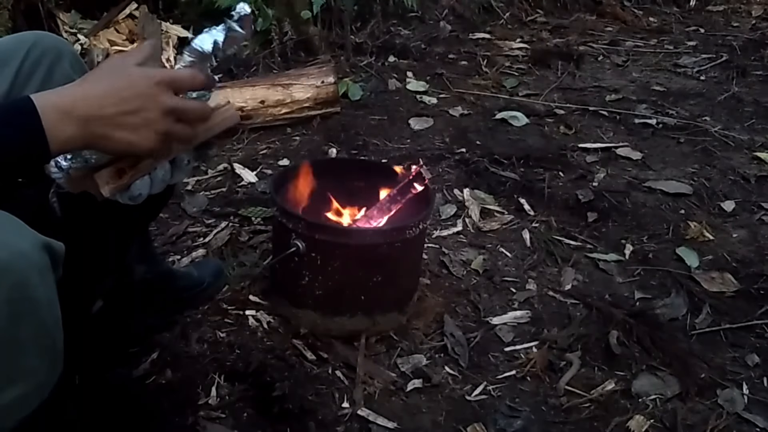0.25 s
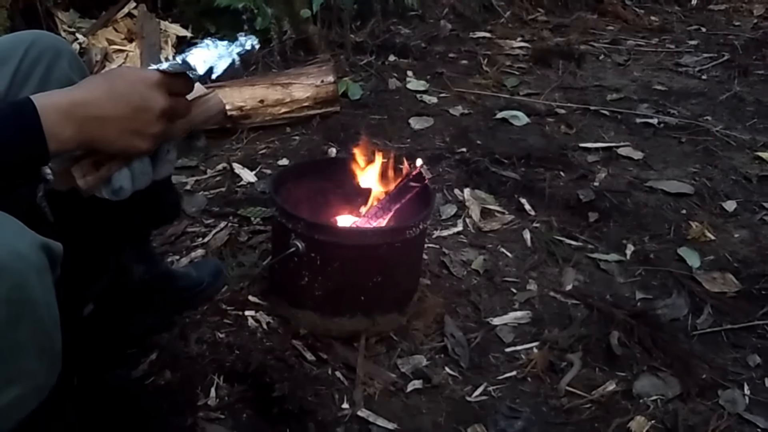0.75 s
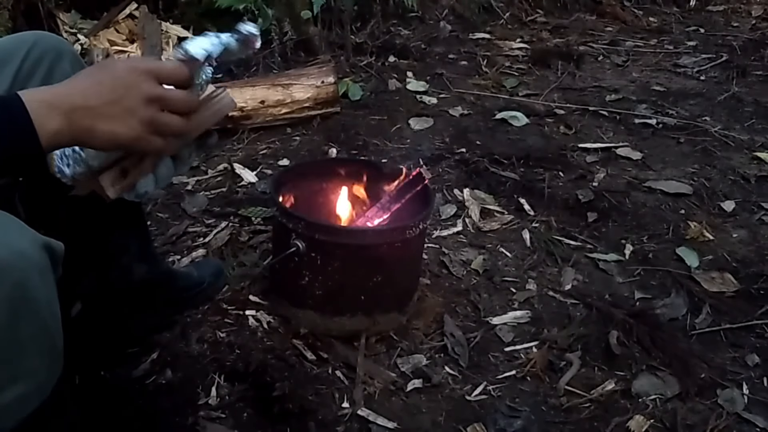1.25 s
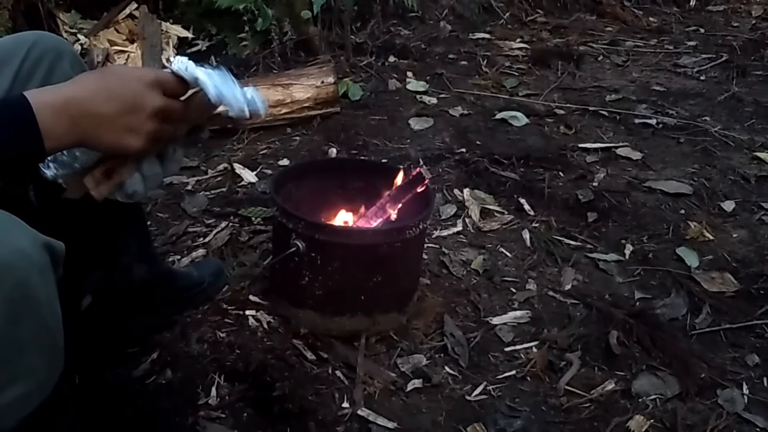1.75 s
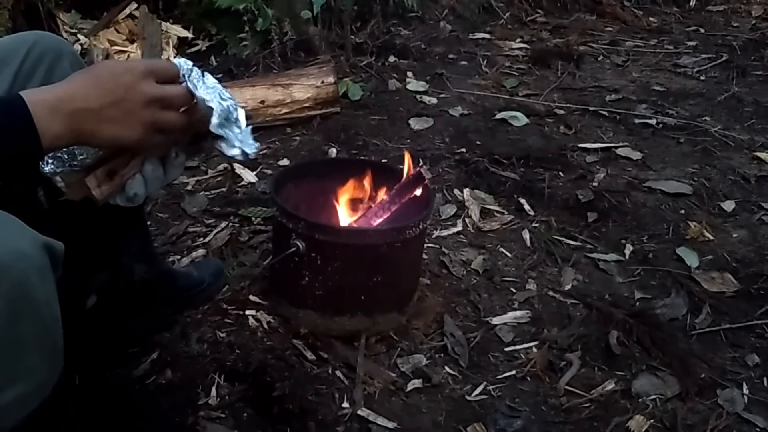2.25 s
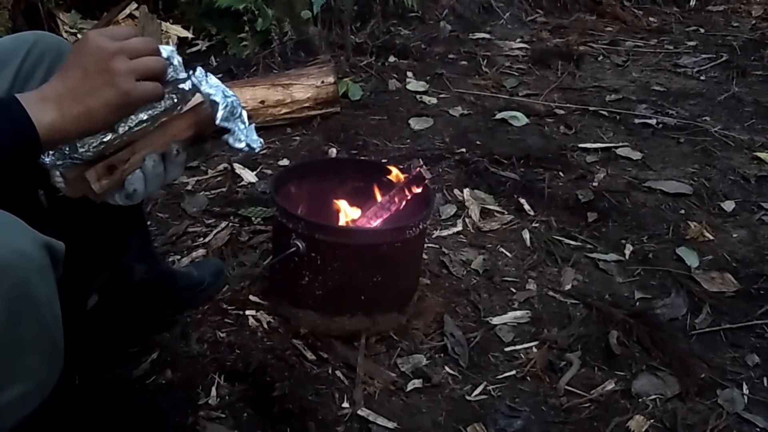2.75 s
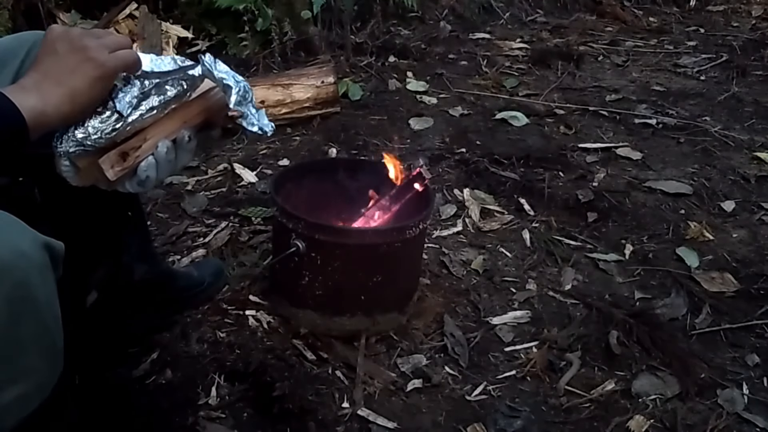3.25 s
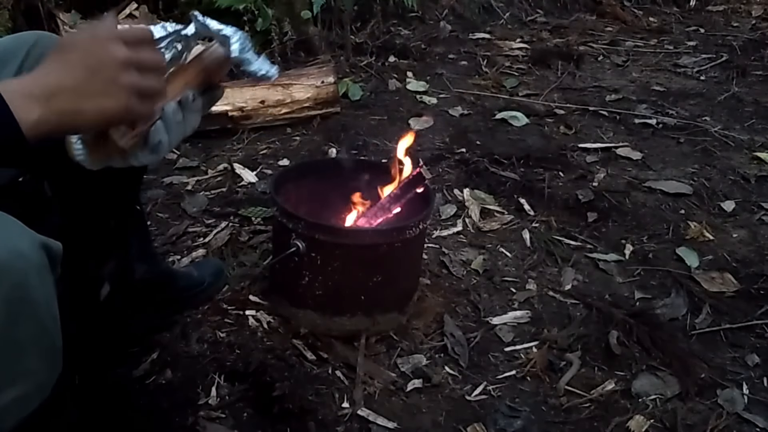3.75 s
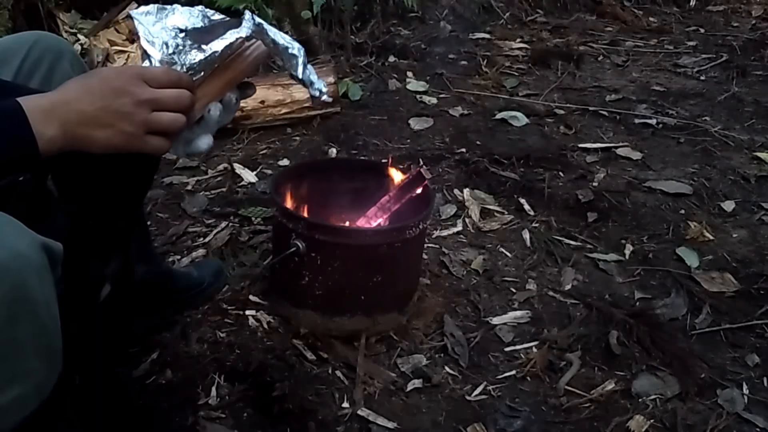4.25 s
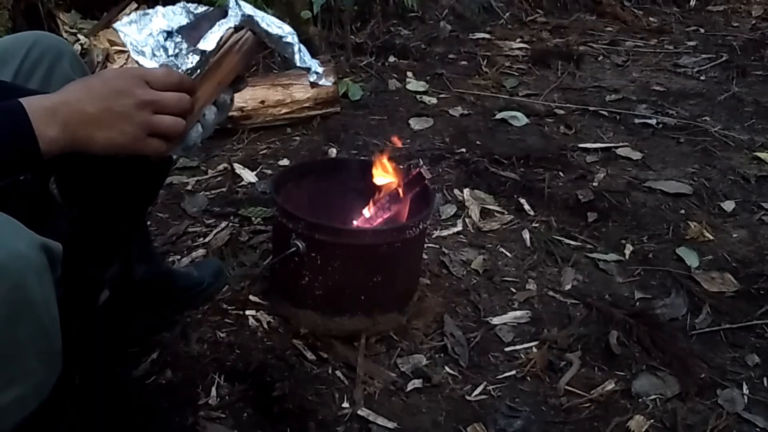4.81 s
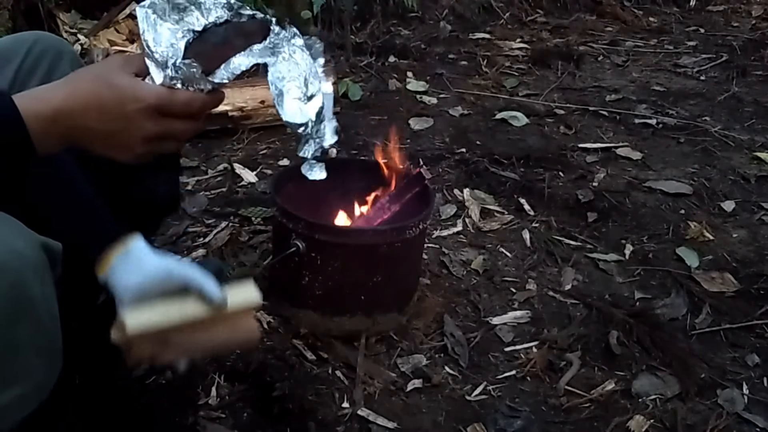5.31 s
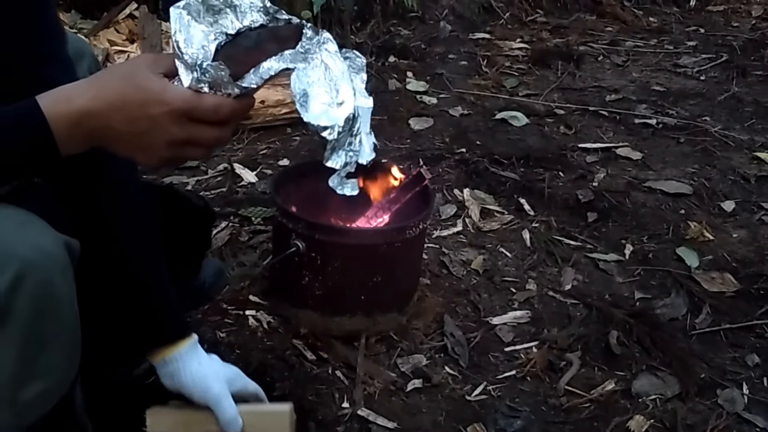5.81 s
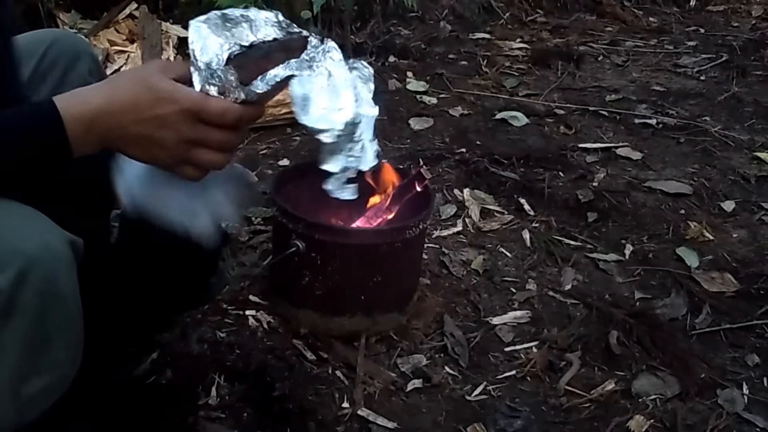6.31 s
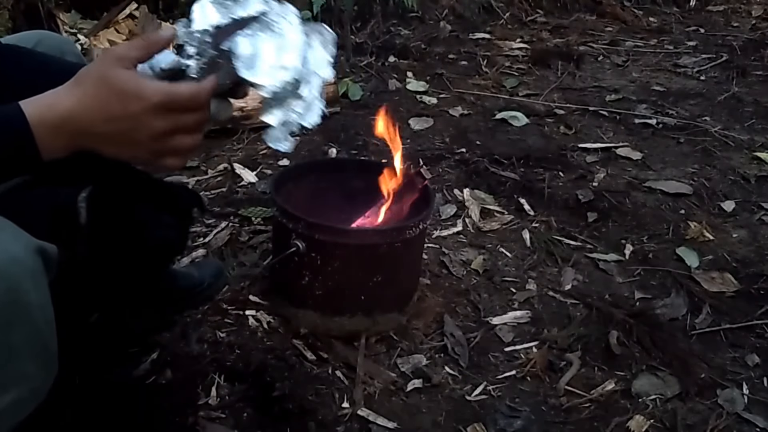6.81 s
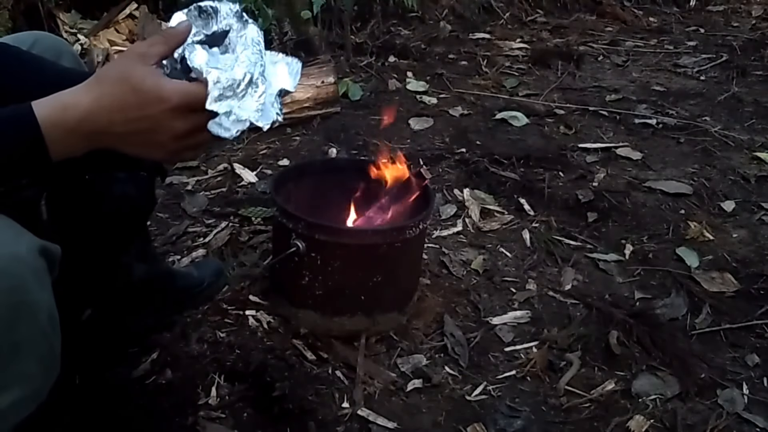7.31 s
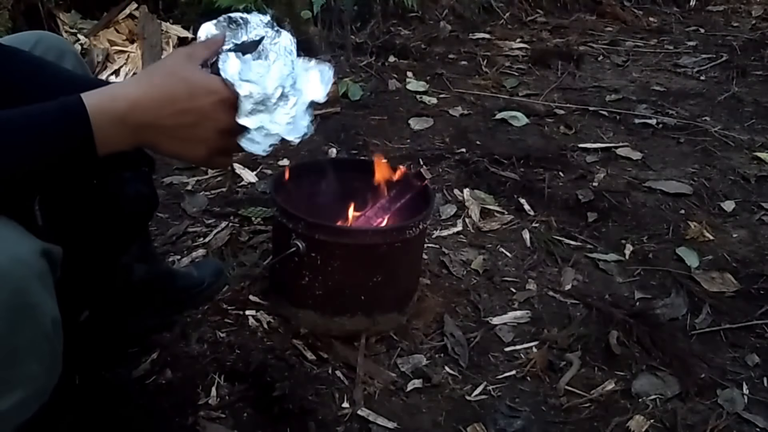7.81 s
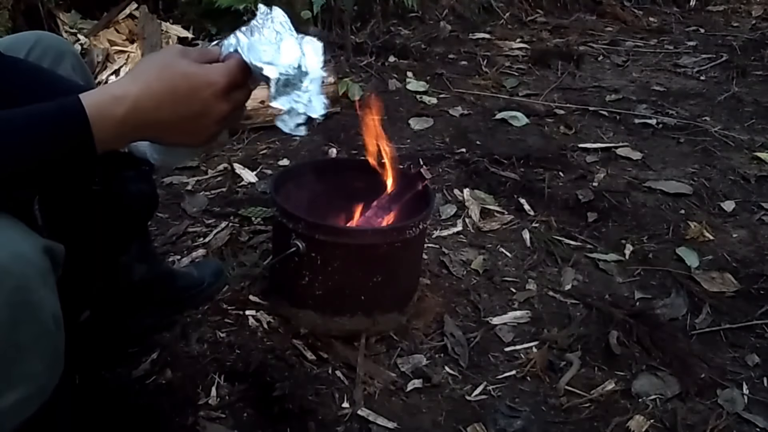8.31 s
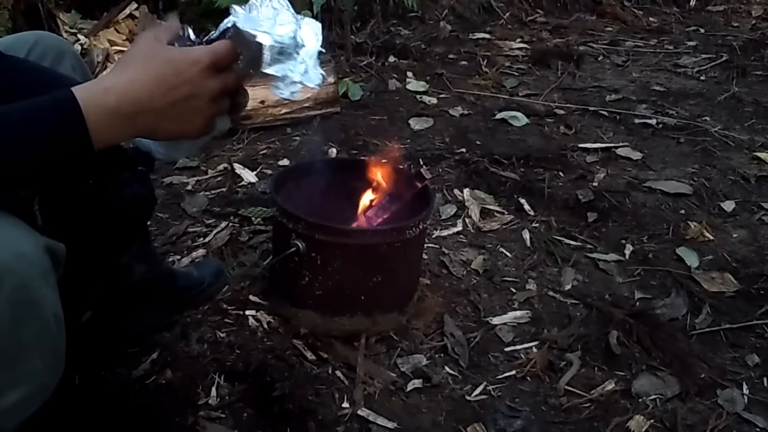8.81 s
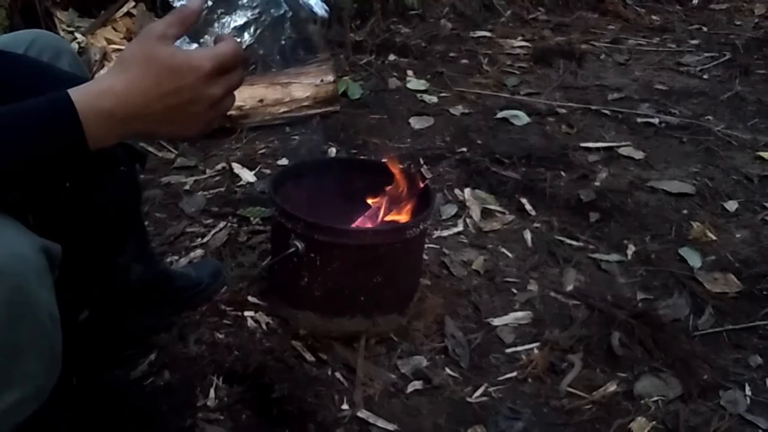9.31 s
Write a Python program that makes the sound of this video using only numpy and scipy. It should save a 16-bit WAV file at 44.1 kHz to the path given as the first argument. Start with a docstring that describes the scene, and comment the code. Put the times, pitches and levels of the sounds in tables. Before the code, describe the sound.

Close, bright foil crinkling comes in flurries of sharp snaps, interrupted by a board's rising scrape and a crunch in dry leaves, over faint open air.

```python
"""Outdoors, close to the microphone, hands peel foil off a baked parcel over a faint rumble of open air.
From the start the foil rustles and buckles in flurries of tiny snaps, with dull knocks of fingers and boards.
Around three seconds a board drags over the foil, squeaks, scrapes higher and slips off in a shriek of tones.
After six seconds the boards crunch into dry leaves and a camp seat creaks; the peeling then goes on.
Clicks through resonances make foil and leaves; stick-slip tones and noise make the boards."""
import sys
import numpy as np
from scipy import signal
from scipy.io import wavfile
from scipy.ndimage import uniform_filter1d, map_coordinates

SR = 44100
rng = np.random.default_rng(int(sys.argv[2]) if len(sys.argv) > 2 else 0)


def dump_mix(stems):
    """Bounce the given channels to the path in sys.argv[1] as a 16-bit WAV at rate SR."""
    frames = np.atleast_2d(stems).T  # one column per channel
    limited = np.clip(frames, -1, 1)  # hard clip at full scale
    pcm = np.round(limited * 32767).astype(np.int16)
    wavfile.write(sys.argv[1], SR, pcm)


N = 421585
TIME = np.arange(N) / SR

# spectrum of the bright foil creases: (frequency [Hz], relative density [dB])
CREASE_SPECTRUM = [(300, -28), (2000, -29.5), (2800, -19.5), (3450, -23), (4400, -17.5), (6900, -16),
                   (7950, -14), (9400, -15.5), (10500, -21.5), (12400, -27), (14200, -38)]
# spectrum of the duller flexing sheet: (frequency [Hz], relative density [dB])
SHEET_SPECTRUM = [(150, -18.5), (290, -7), (400, -1.5), (850, -2), (1400, -4.5), (1750, -9), (2300, -2.5),
                  (3150, -6), (3500, -9), (4500, -1), (8000, -13.5)]
# resonances of the foil parcel: (frequency [Hz], width [Hz], height [dB])
PARCEL_MODES = [(646, 200, 6.5), (1330, 230, 7.5), (2630, 135, 4.5), (3134, 107, 8.5), (4300, 550, 7.5)]
# broad bright ring of the foil in loud snaps and catches: (frequency [Hz], width [Hz], height [dB])
BRIGHT_RING = [(8200, 1800, 8)]
# the narrower bright ring shifts as the sheet is bent: (time [s], frequency [Hz])
BEND_PITCH = [(0.7, 7900), (2.15, 7970), (3.3, 8130), (6.5, 7960)]

# a squeeze takes hold quickly; when it ends the creases stop first, the sheet a little later
ATTACK_S, CREASE_RELEASE_S, SHEET_RELEASE_S = .028, .025, .032


def amp(db):
    """Decibels to gain."""
    return 10 ** (np.asarray(db) / 20)


def unit(x):
    """Scales to an rms of one."""
    return x / np.sqrt(np.mean(x ** 2) + 1e-20)


def curve(rows, axis=1):
    """One column of a table, joined by straight lines in time."""
    rows = np.asarray(rows)
    return np.interp(TIME, rows[:, 0], rows[:, axis])


def stroke(rows, axis=1):
    """Gain of a level curve, silent outside its span."""
    during = (TIME > rows[0][0]) * (TIME < rows[-1][0])
    return amp(curve(rows, axis)) * during


def add(mix, s, sound):
    """Mixes a sound in at time s, in place."""
    part = mix[max(round(s * SR), 0):][:len(sound)]
    part += sound[:len(part)]


def ring(x, response):
    """Plays x through an impulse response."""
    return signal.oaconvolve(x, response)[:len(x)]


def colour(points, peaks=(), size=4096):
    """Causal (minimum-phase) impulse response of unit energy from a spectrum and its resonances."""
    hz = abs(np.fft.fftfreq(size, 1 / SR))
    f, db = np.transpose(points)
    db = np.interp(np.log(hz + 1), np.log(f), db)
    for centre, width, height in peaks:
        db = db + height / (1 + (2 * (hz - centre) / width) ** 2)
    spectrum = np.exp(np.conj(signal.hilbert(np.log(amp(db)))))
    response = np.fft.ifft(spectrum).real
    half = size // 2
    # keep the energy at the front
    if np.sum(response[:half] ** 2) <= np.sum(response[half:] ** 2):
        response = response[::-1]
    return response[:half] / np.linalg.norm(response)


def noise(points, peaks=(), size=4096):
    """Coloured noise of rms one."""
    return unit(ring(rng.standard_normal(N), colour(points, peaks, size=size)))


def wander(per_s):
    """Slow chance of rms one: random knots joined by straight lines."""
    knots = np.arange(0, TIME[-1] + 1, 1 / per_s)
    return unit(np.interp(TIME, knots, rng.standard_normal(len(knots))))


def resonate(x, hz, width):
    """A resonance of gain one that can follow a moving pitch: shift to zero, smooth, shift back."""
    turn = np.exp(2j * np.pi * np.cumsum(hz * np.ones(len(x))) / SR)
    r = np.exp(-np.pi * width / SR)
    smoothed = signal.lfilter([1 - r], [1, -r], x / turn + 1e-18)
    return 2 * (turn * smoothed).real


def brighten(x, hz, width=450, ring_db=14):
    """Adds the bright metallic ring of the foil."""
    return x + amp(ring_db) * resonate(x, hz, width)


def facet(decay_s, scatter, size=700):
    """One facet flips: a sharp click, then bending waves scattering among the creases."""
    t = np.arange(size) / SR
    waves = rng.standard_normal(size) * np.exp(-t / decay_s)
    waves *= scatter / np.linalg.norm(waves)
    waves[0] += 1
    return waves / np.linalg.norm(waves)


def buckles(level_db, per_s=2200, thinning=.5, spread_db=2.5, clump_db=2):
    """Random clicks of uneven size: separate ticks under a light touch, a dense crush under a firm one."""
    rate = per_s * amp(thinning * (level_db + 45.5))  # per_s holds at -45.5 dB
    sizes_db = spread_db * np.minimum(rng.exponential(1, N), 4.5) + clump_db * wander(170)
    signs = rng.choice([-1, 1], N)
    return amp(sizes_db) * signs * (rng.random(N) < rate / SR)


def scattered(clicks, top_hz, ring_s, scatter, tone, scatter_s=.002, size=640):
    """Each click is followed by a puff of scattered waves and by the brief note of its own facet."""
    fall = np.exp(-2 / (scatter_s * SR))
    energy = signal.lfilter([1 - fall], [1, -fall], clicks ** 2)
    waves = rng.standard_normal(N) * np.sqrt(energy)
    at, step = np.flatnonzero(clicks)[:, None], np.arange(size)
    hz = top_hz * rng.random(N)[at]
    dying = np.exp(-step / (ring_s * SR)) * (1 - step / size)
    dying *= np.sqrt(2) / np.linalg.norm(dying)
    notes = clicks[at] * dying * np.sin(2 * np.pi * hz * step / SR)
    notes = np.bincount((at + step).ravel(), notes.ravel(), N)[:N]
    return clicks + scatter * waves + tone * notes


def paced(x, size=1400):
    """Evens out the short-term power, so that the hand's level curve sets the energy of each moment."""
    power = uniform_filter1d(uniform_filter1d(x ** 2, size), size // 2)
    return x / np.sqrt(abs(power) + 1e-4 * np.mean(x ** 2))


def avalanche(length_s, spread_db=4.5, size=1500):
    """A run of clicks of uneven size that dies out over about length_s."""
    t = np.arange(size) / SR
    signs, sizes = rng.standard_normal((2, size))
    return signs * amp(spread_db * sizes) * np.exp(-(t / length_s) ** 2)


def whistle(hz, waver=0.01, waver_per_s=450):
    """A nearly regular stick and slip: a clean tone of rms one that wavers a little."""
    pitch = hz * (1 + waver * wander(waver_per_s))
    return unit(np.sin(2 * np.pi * np.cumsum(pitch) / SR))


def open_air(level_db=-56.5, waver_db=.8):
    """The faint rumble of the place: noise, strongest in the bass, whose level drifts slowly."""
    # (frequency [Hz], relative density [dB])
    air_spectrum = [(20, 4.5), (45, -1.5), (100, -10), (300, -20.5), (560, -22), (680, -21.5), (850, -26),
                    (1350, -26.5), (2000, -29.5), (6300, -31.5), (7500, -25.5), (7950, -29), (8500, -29),
                    (10500, -33.5), (14500, -32)]
    return noise(air_spectrum, size=16384) * amp(level_db + waver_db * wander(5))


def flurry(hold, release_s, sag_db_per_s=3.5, settle_db=-12, settle_s=.078):
    """Gain over one squeeze: attack, a sagging hold, a quick release and a faint, slower settling."""
    t = TIME[:SR] - ATTACK_S / 2
    rise = np.clip(t / ATTACK_S + .5, 0, 1)
    sag = amp(-sag_db_per_s * (np.minimum(t, hold) - hold / 2))
    after = np.maximum(t - hold, 0)
    settling = amp(settle_db) * np.exp(-after / settle_s)
    return rise * sag * np.hypot(np.exp(-after / release_s), settling)


def handling(grip_flex_db=-8, uneven_db=1.0, uneven_per_s=70):
    """Levels in dB of creases and sheet: squeezes add energy to the grip, and the foil yields unevenly."""
    # rustle under the resting fingers: (time [s], crease level [dB])
    grip_levels = [(0, -62), (0.85, -52), (0.96, -64), (1.5, -48.5), (2.05, -60.5), (2.4, -53.5),
                   (2.82, -69), (3.2, -57.5), (3.95, -70), (4.2, -59), (4.85, -71.5), (6.1, -69.5),
                   (6.4, -55.5), (6.9, -68), (8.04, -62.5), (8.25, -54), (9.15, -80.5)]
    # pulls and squeezes: (time [s], hold [s], crease level [dB], flexing sheet level [dB])
    squeezes = [(0.099, 0.077, -55, -62.5), (0.267, 0.11, -54, -84), (0.409, 0.053, -44, -56.5),
                (0.478, 0.14, -50.5, -58.5), (0.691, 0.057, -49.5, -53), (1.012, 0.16, -47.5, -59.5),
                (1.155, 0.13, -40.5, -54), (1.383, 0.091, -38.5, -64), (1.591, 0.077, -38.5, -52.5),
                (1.817, 0.035, -45.5, -57), (1.884, 0.085, -51, -62.5), (2.128, 0.046, -39.5, -56),
                (2.182, 0.15, -50, -59.5), (2.439, 0.15, -54, -63.5), (2.587, 0.032, -42, -52),
                (2.649, 0.013, -38.5, -52.5), (2.956, 0.14, -51.5, -73), (3.265, 0.04, -50.5, -67),
                (3.393, 0.07, -54, -76), (3.598, 0.035, -49.5, -82), (4.08, 0.05, -45.5, -58.5),
                (4.552, 0.19, -57.5, -70.5), (5.043, 0.095, -57, -70), (5.165, 0.21, -55.5, -73),
                (6.195, 0.13, -53, -68), (6.499, 0.044, -44, -55), (6.632, 0.023, -45, -56),
                (6.752, 0.06, -57, -68.0), (7, 0.061, -58, -65.5), (7.275, 0.068, -47, -58.5),
                (7.517, 0.058, -38, -54), (7.584, 0.018, -37, -48), (7.756, 0.014, -39, -51),
                (7.803, 0.056, -38, -49.5), (7.913, 0.06, -50, -58), (8.127, 0.0084, -40, -59),
                (8.56, 0.11, -54.5, -62), (8.708, 0.065, -56, -71), (8.853, 0.15, -57, -68),
                (8.985, 0.045, -43, -54.5), (9.069, 0.11, -50, -59.5), (9.224, 0.02, -46.5, -59.5)]
    grip_db = curve(grip_levels)
    creases, sheet = amp(grip_db) ** 2, amp(grip_db + grip_flex_db) ** 2
    for start, hold, crease_db, flex_db in squeezes:
        onset = start - ATTACK_S / 2
        add(creases, onset, (amp(crease_db) * flurry(hold, CREASE_RELEASE_S)) ** 2)
        add(sheet, onset, (amp(flex_db) * flurry(hold, SHEET_RELEASE_S)) ** 2)
    uneven = uneven_db * wander(uneven_per_s)
    return 10 * np.log10(creases) + uneven, 10 * np.log10(sheet) + uneven


def crinkle(crease_db=-0.88, sheet_db=-0.55, grit_db=-18):
    """The same buckles sound bright creases and duller sheet; layers rubbing together add a fine grit."""
    # the wrapped parcel's hollow notes: (frequency [Hz], width [Hz], gain before cupping [dB])
    hollow_notes = [(707, 55, 1), (2790, 150, 6)]
    # how freely they ring, most when the parcel is cupped in both hands: (time [s], gain [dB])
    cupped_gain = [(6.2, -13), (7.2, 8), (7.9, 8), (8.8, -27)]
    level_db, flex_db = handling()
    clicks = buckles(level_db)
    creases = scattered(clicks, top_hz=14000, ring_s=.002, scatter=.55, tone=.6)
    creases = brighten(ring(creases, colour(CREASE_SPECTRUM)), curve(BEND_PITCH))
    sheet = scattered(clicks, top_hz=3600, ring_s=.006, scatter=1.8, tone=1.3)
    sheet = ring(sheet, colour(SHEET_SPECTRUM, PARCEL_MODES))
    hollow = sum(amp(db) * resonate(sheet, hz, width) for hz, width, db in hollow_notes)
    sheet = paced(sheet + amp(curve(cupped_gain)) * hollow, size=2200)
    grit = unit(np.diff(rng.standard_normal(N + 1)))
    bright = paced(creases) + amp(grit_db) * grit
    return amp(level_db + crease_db) * bright + amp(sheet_db + flex_db) * sheet


def folds(x, echo=0.36, delay_s=0.000595, shifts_per_s=11):
    """A nearby fold reflects the sound; as it moves, the peaks and notches of the colour shift."""
    delay = delay_s * 2 ** (wander(shifts_per_s) / 2)
    reflected = map_coordinates(x, [(TIME - delay) * SR])
    return (x + echo * reflected) / np.hypot(1, echo)


def knocks(focus_db_per_octave=12, size=4000):
    """Fingers and boards knock: short, damped modes of the wood, favoured by the place that is struck."""
    # (time [s], peak level [dB], frequency around which the wood rings most [Hz])
    dull_knocks = [(0.044, -53, 520), (0.178, -46.5, 990), (1.504, -41.5, 450), (1.526, -42.5, 450),
                   (2.662, -40, 900), (2.99, -45, 950), (3.603, -45, 680), (6.226, -40, 500),
                   (6.258, -44, 380), (7.818, -41, 720), (8.613, -49, 1050), (9.032, -43.5, 417)]
    # modes of the wood: (frequency [Hz], width [Hz], relative level [dB])
    wood_modes = [(360, 130, -4.5), (550, 81, 4.5), (697, 53, 6.5), (978, 115, 9.5), (1294, 59, 5)]
    out, t = np.zeros(N), np.arange(size) / SR
    for s, db, centre_hz in dull_knocks:
        chance = rng.standard_normal((len(wood_modes), 2))
        knock = np.zeros(size)
        for (hz, width, mode_db), (level_chance, pitch_chance) in zip(wood_modes, chance):
            off_focus_db = focus_db_per_octave * abs(np.log2(hz / centre_hz))
            gain = amp(mode_db + 1.25 * level_chance - off_focus_db)
            tone = np.sin(2 * np.pi * hz * (1 + 0.029 * pitch_chance) * t)
            knock += gain * np.exp(-np.pi * width * t) * tone
        knock = ring(knock, facet(0.0071, 2.5))
        add(out, s, amp(db) * knock / abs(knock).max())
    return out


def at_peak(x, db, size=100):
    """Scales a burst so that its loudest two milliseconds peak near db."""
    return amp(db) * x / (2 * np.sqrt(uniform_filter1d(x ** 2, size).max()))


def snaps(sheet_db=-9, facet_db=9, facet_width=700, run_s=.016, run_growth=.31, size=2048):
    """A large crease gives way and sets off its neighbours within milliseconds; each has its facet note."""
    # single loud buckles: (time [s], approximate peak level [dB])
    loud_buckles = [(0.1113, -36.5), (0.315, -38.5), (0.692, -34.5), (0.762, -36), (1.1026, -28.5),
                    (1.1193, -25), (1.1952, -33), (1.2672, -30), (1.3668, -29.5), (1.4648, -25),
                    (1.587, -26), (1.595, -28), (1.8297, -34), (1.8587, -29), (1.907, -31), (1.984, -38),
                    (2.1479, -30.5), (2.339, -34.5), (2.3685, -33), (2.612, -30), (2.662, -24),
                    (2.9453, -33), (3.1194, -39), (3.15, -34.5), (3.2208, -36), (3.509, -43.5),
                    (4.1121, -28), (4.2675, -37.5), (4.3383, -33.5), (4.4742, -37), (4.5171, -44),
                    (4.6785, -37), (4.9215, -43.5), (5.0454, -41), (5.0604, -37), (5.1891, -39.5),
                    (5.224, -36), (5.2374, -36), (5.2664, -41), (6.006, -42.5), (6.227, -30.5),
                    (6.311, -33.5), (6.4995, -35.5), (6.5146, -26.5), (6.543, -25.5), (6.6505, -30.5),
                    (7.4386, -36.5), (7.5188, -29), (7.5966, -25), (7.7536, -28), (7.789, -25.5),
                    (8.1369, -27.5), (8.2442, -37), (8.3594, -40), (8.3789, -38.5), (8.5619, -37.5),
                    (8.9231, -39), (9.017, -31.5), (9.2328, -33)]
    # range in which the facet of a snap rings: (lowest [Hz], highest [Hz])
    facet_range = (3800, 7180)
    out, ring_hz = np.zeros(N), curve(BEND_PITCH)
    dull = colour(SHEET_SPECTRUM, PARCEL_MODES)
    for s, db in loud_buckles:
        run = avalanche(run_s * amp(run_growth * db))  # a bigger buckle sets off a longer run
        note = (rng.uniform(*facet_range), facet_width, facet_db)
        bright = colour(CREASE_SPECTRUM, [*BRIGHT_RING, note])
        snap = brighten(signal.fftconvolve(run, bright)[:size], ring_hz[round(s * SR)])
        snap += amp(sheet_db) * signal.fftconvolve(run, dull)[:size]
        add(out, s + .0005, at_peak(snap, db))
    return out


def pings(decay_s=0.0014, size=900):
    """A taut facet pops and rings for a few cycles."""
    # (time [s], peak level [dB], pitch [Hz])
    taut_facets = [(1.596, -30.5, 2900), (4.551, -49, 3100), (5.1163, -44, 5340), (5.4295, -53, 6070),
                   (6.286, -40.5, 1930), (8.2445, -43.5, 2080)]
    out, t = np.zeros(N), np.arange(size) / SR
    for s, db, hz in taut_facets:
        note = np.exp(-t / decay_s) * np.sin(2 * np.pi * hz * t)
        ping = ring(note, facet(0.004, 0.89))
        add(out, s, amp(db) * ping / abs(ping).max())
    return out


def rasp(hz, width, stick_db):
    """Uneven sticking and slipping: noise through one resonance, applied twice, with a jumpy level."""
    drive = rng.standard_normal(N)
    resonant = resonate(resonate(drive, hz, width), hz, width)
    return unit(paced(resonant) * amp(stick_db * wander(270)))


def slide(stick_db=3.5, drag_db=-3.0, scrape_width=1000, waver=.013, tone_db=-5):
    """The board drags over the wrinkles with a wavering squeak, then scrapes higher as it speeds up."""
    # the drag: (time [s], level before drag_db [dB])
    drag_levels = [(2.88, -70), (2.97, -55.5), (3.1, -66.5), (3.25, -71), (3.28, -56), (3.5, -72),
                   (3.585, -91), (3.605, -59), (3.65, -89)]
    # the board's spectrum: (frequency [Hz], relative density [dB])
    board_spectrum = [(250, -28), (680, 1.5), (1080, 5), (1800, -10), (2600, -13), (5000, -31)]
    # the squeak on the foil: (time [s], level [dB])
    squeak_levels = [(3.26, -76), (3.305, -57), (3.4, -69), (3.48, -75), (3.535, -83), (3.555, -60),
                     (3.6, -65), (3.66, -74)]
    # its pitch creeps up: (time [s], frequency [Hz])
    squeak_pitch = [(3.45, 4210), (3.56, 4380)]
    # the scrape climbs as the board gathers speed: (time [s], pitch [Hz], level [dB])
    scrape_path = [(3.555, 4350, -67), (3.615, 5150, -59), (3.65, 5950, -60), (3.675, 6600, -57),
                   (3.725, 7200, -64)]
    drag = noise(board_spectrum, PARCEL_MODES) * unit(amp(stick_db * wander(200)))
    squeak = whistle(curve(squeak_pitch), waver) * unit(amp(stick_db * wander(200)))
    scrape_hz = curve(scrape_path)
    scrape = rasp(scrape_hz, scrape_width, stick_db) + amp(tone_db) * whistle(scrape_hz, 2 * waver)
    out = amp(drag_db) * stroke(drag_levels) * drag
    out += stroke(squeak_levels) * squeak
    return out + stroke(scrape_path, axis=2) * unit(scrape)


def slip(stick_db=3, hiss_db=-6, catch_s=0.0025, size=2048):
    """The foil's edge shrieks off the board in a stack of tones, catching and springing free twice."""
    # the edge slipping free: (time [s], level of the tones [dB])
    slip_levels = [(3.709, -64), (3.714, -45), (3.728, -46), (3.735, -36), (3.757, -41), (3.764, -53),
                   (3.782, -60)]
    # tones of the edge: (frequency [Hz], relative level [dB])
    edge_tones = [(8150, 2), (8950, -3), (10000, -15), (11680, -11), (12650, -22)]
    # spectrum of the edge: (frequency [Hz], relative density [dB])
    edge_spectrum = [(3400, -27), (4500, -13), (8500, -6), (14500, -17)]
    # wrinkles that catch on it: (time [s], peak level [dB])
    catches = [(3.7335, -28.5), (3.747, -29)]
    tones = unit(sum(amp(db + stick_db * wander(250)) * whistle(hz) for hz, db in edge_tones))
    out = (tones + amp(hiss_db) * noise(edge_spectrum)) * stroke(slip_levels)
    edge = colour(edge_spectrum, BRIGHT_RING)
    for s, db in catches:
        catch = signal.fftconvolve(avalanche(catch_s), edge)[:size]
        add(out, s, amp(db) * catch / abs(catch).max())
    return out


def leaves():
    """Dry leaves and twigs crunch densely under the boards, with no metallic ring."""
    # the boards are set down: (time [s], level [dB])
    crunch_levels = [(6.156, -62), (6.18, -57), (6.185, -49.5), (6.22, -47.5), (6.229, -39.5), (6.24, -44),
                     (6.264, -41.5), (6.315, -49), (6.335, -57.5), (6.42, -68.5)]
    # spectrum of the leaf litter: (frequency [Hz], relative density [dB])
    litter_spectrum = [(250, -1), (1350, -1.5), (1700, -6), (2400, -0.5), (5000, -2), (9200, 3.5),
                       (14000, -19)]
    clicks = buckles(curve(crunch_levels), per_s=5000)
    cracks = scattered(clicks, top_hz=6000, ring_s=.002, scatter=1.0, tone=.5)
    return paced(ring(cracks, colour(litter_spectrum))) * stroke(crunch_levels)


def creak(jitter_per_hz=.0007, jitter_per_s=160, uneven_db=4.0):
    """The seat sticks and slips, less evenly when fast; each slip is a dull thump in its frame."""
    # the weight on the seat shifts: (time [s], mean slip rate [1/s], level [dB])
    creak_path = [(6.23, 155, -67), (6.335, 160, -55.5), (6.37, 140, -55.5), (6.43, 134, -64),
                  (6.5, 66, -73), (6.64, 61, -58), (6.74, 61, -58.5), (6.79, 50, -80)]
    # spectrum of its frame: (frequency [Hz], relative density [dB])
    seat_spectrum = [(55, -1), (185, 2), (250, -5), (400, -20), (700, -29)]
    rate = curve(creak_path)
    turns = np.cumsum(rate * (1 + jitter_per_hz * rate * wander(jitter_per_s))) / SR
    slips = np.diff(np.floor(turns), prepend=0)  # one slip at each whole turn
    slips = slips * amp(uneven_db * wander(jitter_per_s)) / np.sqrt(rate)
    return unit(ring(slips, colour(seat_spectrum))) * stroke(creak_path, axis=2)


def surroundings(x, wet_db=-9.0, t60=0.11, size=11000):
    """Hands, ground and nearby logs scatter a short, faint tail: decaying noise after a 4 ms gap."""
    t = np.arange(size) / SR
    tail = rng.standard_normal(size) * amp(-60 * t / t60) * (t > .004)
    return x + amp(wet_db) * ring(x, tail / np.linalg.norm(tail))


def scene():
    """Foil, boards, leaves and seat with their short tail, over the open air."""
    foil = folds(crinkle()) + snaps() + pings()
    boards = knocks() + slide() + slip()
    handled = foil + boards + leaves() + creak()
    return (surroundings(handled) + open_air())[None]


def record(dry, cutoff_hz=14300):
    """The recorder's band limit: a steep low-pass."""
    low_pass = signal.firwin(401, cutoff_hz, window=("kaiser", 8), fs=SR)
    return signal.oaconvolve(dry, low_pass[None], "same")


dry = scene()
out = record(dry)
dump_mix(out)
```